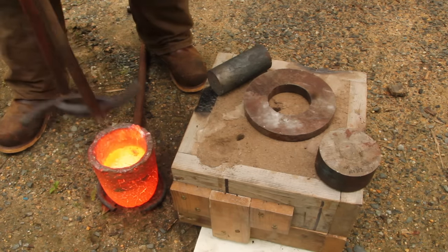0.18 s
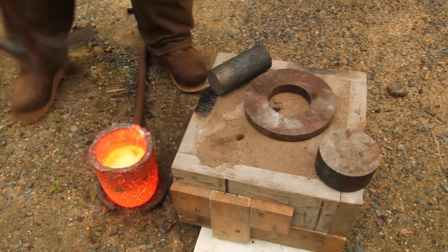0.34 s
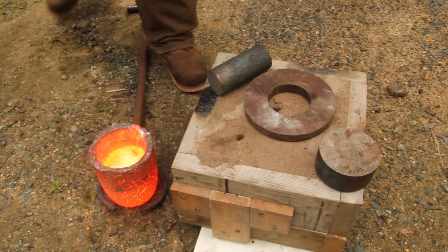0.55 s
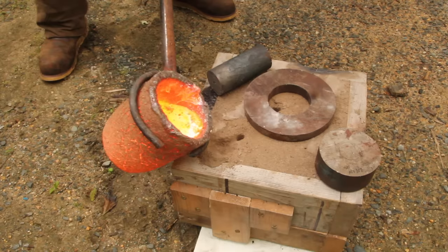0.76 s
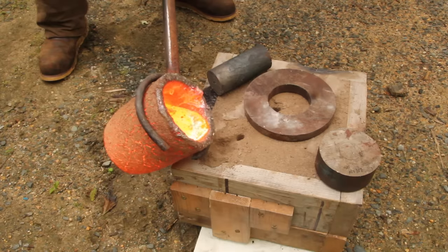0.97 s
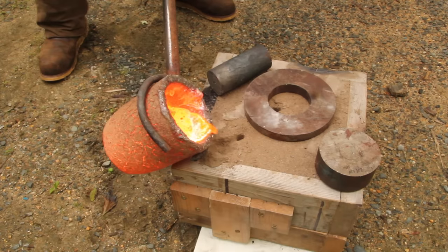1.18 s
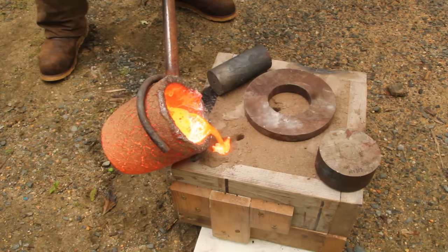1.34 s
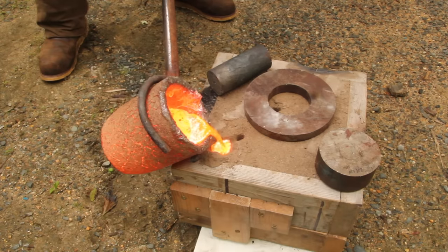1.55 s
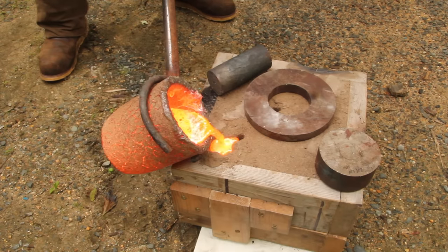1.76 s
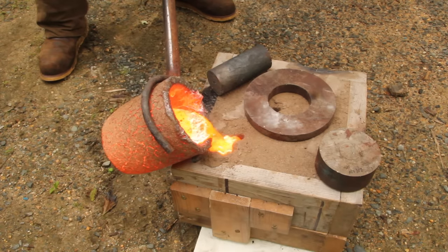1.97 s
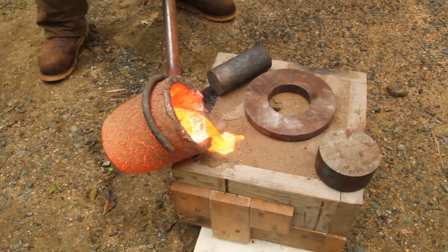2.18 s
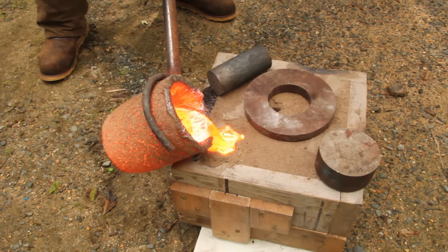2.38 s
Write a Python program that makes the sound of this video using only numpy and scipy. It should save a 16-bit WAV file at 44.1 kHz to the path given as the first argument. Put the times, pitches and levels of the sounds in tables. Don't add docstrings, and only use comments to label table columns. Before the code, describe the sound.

Iron tongs land on gravel with one sharp, bright double clink and gritty crack, quickly damped; a soft boot scrape follows, then sparse spits and growing faint sizzle of poured metal, close microphone in an open yard.

```python
import sys
import numpy as np
from scipy import signal
from scipy.io import wavfile

SR = 44100
rng = np.random.default_rng(int(sys.argv[2]) if len(sys.argv) > 2 else 0)


def transcribe(signal):
    frames = np.atleast_2d(signal).T
    limited = np.clip(frames, -1, 1)
    pcm = np.round(limited * 32767).astype(np.int16)
    wavfile.write(sys.argv[1], SR, pcm)


def amplitude_ratio(level_db):
    exponent = np.asarray(level_db, float) / 20
    return 10 ** exponent


N = 105840


def in_time(rows):
    return np.interp(np.arange(N) / SR, *np.transpose(rows))


def rms_one(x):
    return x / np.sqrt(np.mean(x ** 2) + 1e-20)


def band(x, hz, order=2):
    sos = signal.butter(order, np.clip(hz, 10, .45 * SR), "band", fs=SR, output="sos")
    return signal.sosfilt(sos, x + 1e-18)


def clicks(s, gains):
    out = np.zeros(N)
    out[(np.asarray(s) * SR).astype(int)] = gains
    return out


def drift(rate_hz):
    r = np.exp(-80 * np.pi * rate_hz / SR)
    noise = rng.standard_normal(N // 40 + 2002)
    slow = signal.lfilter([1], [1, -2 * r, r * r], noise)[2000:]
    return np.interp(np.arange(N) / 40, np.arange(len(slow)), rms_one(slow))


def coloured(spectrum, patchy_db):
    out = 0
    edges_hz = 45 * 2 ** np.arange(0, 8.6, .5)
    white = rng.standard_normal((2, N))
    hz, db = np.transpose(spectrum)
    for k, pair in enumerate(zip(edges_hz, edges_hz[1:])):
        level_db = np.interp(np.log(pair).mean(), np.log(hz), db)
        out = out + amplitude_ratio(level_db + patchy_db * drift(6.7)) * band(white[k % 2], pair)
    return rms_one(out)


def strike(pitches_hz, modes, s, db):
    out = np.zeros(N)
    for hz, (level_db, t60_s) in zip(pitches_hz, modes):
        r = amplitude_ratio(-60 / (t60_s * SR))
        w = 2 * np.pi * hz / SR
        push = clicks(s, amplitude_ratio(db + level_db + .8 * rng.standard_normal(len(s))))
        out += signal.lfilter([0, np.sin(w)], [1, -2 * r * np.cos(w), r * r], push + 1e-18)
    return out


# time in s, level of the arm in dB, level of the jaw in dB.
TOUCHES = [
    (.2465, -36, -44),
    (.2474, -34, -44),
    (0.2484, -10, -28),
    (0.2512, -14.5, -44),
    (0.2537, -21.5, -44),
    (0.2557, -23, -14.5),
    (.2578, -28.5, -24),
    (0.2606, -30.5, -24),
    (0.282, -33.5, -33.5),
    (.2885, -47, -48),
]
ARM_HZ = [1580, 2000, 2462, 4120, 4900, 5300, 5440, 5855, 8230, 9690, 11640, 12700, 13910, 15600]
JAW_HZ = [1809, 2710, 3355, 4240, 4637, 6460, 6656, 6975, 7364, 8858, 9330, 10510, 11880, 14550]
# level in dB, t60 in s.
ARM_MODES = [(-9, .09), (-10, .09), (-19, 0.053), (-7, .11), (-14, .05), (-2.5, .055), (-5, .055),
             (-8.5, 0.077), (-17.5, .08), (-12.5, 0.062), (-31.5, .06), (-23.5, .05), (-28, .05),
             (-23.5, 0.055)]
JAW_MODES = [(-14, .06), (-15, .06), (-1.5, .09), (-9, .12), (-15.5, 0.042), (-12.5, .12), (-4.5, 0.078),
             (-11, .07), (-1.5, 0.094), (-1.5, .16), (-16, 0.11), (-23, .03), (-21, 0.065), (-20.5, .05)]
# frequency in Hz, density in dB per Hz.
CRACK = [(150, -32), (600, -22), (1200, -21), (1900, -9), (3350, -7), (5360, -1.5), (9500, -14),
         (16000, -28)]


def tongs():
    crack_db, crack_t60_s = -11.5, 0.061
    settle_s, settle_over_s, settle_loss_db = 0.2666, .012, -9.5
    thud_hz, thud_db, thud_t60_s = 260, -49, .08
    s, arm_db, jaw_db = np.transpose(TOUCHES)
    ring = strike(ARM_HZ, ARM_MODES, s, arm_db) + strike(JAW_HZ, JAW_MODES, s, jaw_db)
    settled = np.clip((np.arange(N) / SR - settle_s) / settle_over_s, 0, 1)
    thin = signal.butter(2, 1350, "high", fs=SR, output="sos")
    ring = signal.sosfilt(thin, ring * amplitude_ratio(settle_loss_db * settled))
    ring = ring + strike([thud_hz], [(thud_db, thud_t60_s)], s[2:3], 0)

    hits = clicks(s, amplitude_ratio(np.maximum(arm_db, jaw_db)))
    dying = signal.lfilter([1], [1, -amplitude_ratio(-60 / (crack_t60_s * SR))], hits + 1e-18)
    return ring, amplitude_ratio(crack_db) * dying * coloured(CRACK, patchy_db=.3)


# delay in s, level in dB.
ECHOES = [
    (.0355, -29),
    (.047, -40),
    (.105, -38),
]


def yard(x):
    tail_db, tail_t60_s, tail_rise_s = -32, 0.58, 0.024
    wall_cut_hz, echo_spread_s = 5300, 0.0026
    t = np.arange(N) / SR
    tail = amplitude_ratio(tail_db - 20.5 - 60 * t / tail_t60_s) * (1 - np.exp(-t / tail_rise_s))
    reply = tail * rng.standard_normal(N)
    for lag_s, db in ECHOES:
        smear = (t >= lag_s) * np.exp(-np.abs(t - lag_s) / echo_spread_s)
        reply += amplitude_ratio(db - 13) * smear * rng.standard_normal(N)
    reply = signal.sosfilt(signal.butter(1, wall_cut_hz, fs=SR, output="sos"), reply)
    return signal.fftconvolve(x, reply)[:N]


# frequency in Hz, density in dB per Hz.
SCRAPE = [(120, -21), (300, 3), (800, -6.5), (2000, -12.5), (6000, -28.5)]


def scrape():
    peak_s, rise_s, fall_s, level_db = 0.35, .07, 0.18, -56
    t = np.arange(N) / SR - peak_s
    stroke = np.exp(-(t / np.where(t < 0, rise_s, fall_s)) ** 2)
    return amplitude_ratio(level_db) * stroke * coloured(SCRAPE, patchy_db=3.5)


# time in s, peak in dB, treble share in dB.
SPITS = [(.2011, -40, -20), (.4443, -47, 0), (1.1644, -34, -5.5), (1.3705, -42, -22), (1.4586, -32, -32),
         (1.5063, -37, -11), (1.5719, -44, -2), (1.5863, -44, -1), (1.6254, -41, -4), (1.9455, -47, 0),
         (1.9718, -42, -1), (2.035, -51, -4), (2.0775, -38, -22), (2.081, -42, 3), (2.0957, -41, -4),
         (2.1234, -52, -7), (2.1257, -42.5, 1.5), (2.1626, -32, -2), (2.1787, -40, -9), (2.1889, -33, -3),
         (2.2088, -39, -10), (2.2238, -41.5, -6.5), (2.2273, -38.5, -6), (2.2368, -46, -25),
         (2.2862, -32, -4), (2.3259, -27, -5), (2.3657, -40.5, -24), (2.3732, -44, -9), (2.3923, -40, -3.5)]


def spits():
    spit_hz, split_hz = (2500, 15500), 8500
    tail_db, tail_s = -19, .001
    s, db, treble_db = np.transpose(SPITS)
    rough = rng.standard_normal(N)
    low_pass = signal.butter(3, split_hz, fs=SR)

    def bursts(gains):
        burst = clicks(s, gains)
        tail = signal.lfilter([amplitude_ratio(tail_db)], [1, -np.exp(-1 / (tail_s * SR))], burst + 1e-18)
        wide = band(tail * rough - burst, spit_hz)
        return wide, signal.filtfilt(*low_pass, wide)

    _, body = bursts(amplitude_ratio(db + 8))
    wide, below = bursts(amplitude_ratio(db + treble_db + 9.5))
    return body + wide - below


# time in s, level in dB.
SIZZLE = [(1.3, -77), (1.5, -70), (1.62, -70), (1.7, -73), (1.8, -70), (1.95, -68), (2.05, -71), (2.1, -65),
          (2.23, -64), (2.26, -71), (2.33, -65), (2.4, -67)]


def sizzle():
    grains_per_s, grain_spread_db, steam_share = 1800, 3.8, .6
    sizzle_hz, gain_db = (6100, 15400), 0.5
    start_s, fade_s = 1.25, .2
    sizes = amplitude_ratio(grain_spread_db * np.minimum(rng.exponential(1, N), 4)) * rng.choice([-1, 1], N)
    born = rng.random(N) < grains_per_s * amplitude_ratio(4 * drift(25)) / SR
    smooth = steam_share * amplitude_ratio(3 * drift(15)) * rng.standard_normal(N)
    steam = rms_one(sizes * born) + smooth
    begun = np.clip((np.arange(N) / SR - start_s) / fade_s, 0, 1)
    return begun * amplitude_ratio(in_time(SIZZLE) + gain_db) * rms_one(band(steam, sizzle_hz))


# time in s, length in s, start pitch in Hz, end pitch in Hz, level in dB.
CHIRPS = [
    (.78, 0.16, 6800, 7300, -71),
    (.62, .08, 7250, 7100, -76),
    (.68, 0.104, 6600, 6300, -76),
    (.95, 0.19, 6400, 6900, -75),
    (1.935, .03, 2600, 2800, -72),
    (2.291, .01, 4190, 5500, -70),
    (2.366, 0.017, 3100, 4900, -68),
]


def chirps():
    out = np.zeros(N)
    t = np.arange(N) / SR
    for s, length_s, start_hz, end_hz, db in CHIRPS:
        u = np.clip((t - s) / length_s, 0, 1)
        phase = 2 * np.pi * np.cumsum(start_hz + (end_hz - start_hz) * u) / SR
        out += amplitude_ratio(db + 7) * drift(70) * np.sin(np.pi * u) ** .6 * np.sin(phase)
    return out


# frequency in Hz, density in dB per Hz.
AIR = [(60, -7), (110, -5.5), (250, -14.5), (700, -19), (2500, -20.5), (6800, -22), (10000, -32),
       (16000, -38.5)]
# time in s, level in dB.
AIR_LEVEL = [(0.0, -60.5), (0.25, -59.5), (0.39, -58.5), (0.73, -59.5), (1.63, -60), (2.4, -60.5)]


def far_hiss():
    gain_db = 2.5
    return amplitude_ratio(in_time(AIR_LEVEL) + gain_db) * coloured(AIR, patchy_db=1.1)


# time in s, level in dB.
GUST = [(0.0, -75), (0.03, -59), (0.21, -65.5), (0.3, -51.5), (0.33, -68), (0.95, -69), (1.04, -51.5),
        (1.09, -63), (1.32, -58), (1.5, -68.5), (1.66, -48.5), (1.75, -68), (1.86, -61.5), (1.91, -74),
        (2.28, -59), (2.4, -75)]


def wind():
    return amplitude_ratio(in_time(GUST)) * rms_one(band(rng.standard_normal(N), (14.6, 39.7)))


def port_rumble():
    return amplitude_ratio(-88.5) * rms_one(band(rng.standard_normal(N), (12, 60)))


def scene():
    ring_echo_db, grit_echo_db = .3, 2.5
    ring, grit = tongs()
    echoes = yard(amplitude_ratio(ring_echo_db) * ring + amplitude_ratio(grit_echo_db) * grit)
    pour = spits() + sizzle() + chirps()
    mid = ring + grit + echoes + scrape() + pour + far_hiss() + wind()
    side = port_rumble()
    return np.array([mid + side, mid - side])


def band_limit(x):
    return signal.sosfilt(signal.butter(12, 16840, fs=SR, output="sos"), x)


def record(dry):
    rounded = .9 * np.tanh(dry / .9)
    top_cut = signal.cheby2(12, 32, 16050, fs=SR, output="sos")
    offset = np.array([-.00128, -.00188])
    mix = signal.sosfilt(top_cut, rounded) + offset[:, None]
    return band_limit(mix)


dry = scene()
out = record(dry)
transcribe(out)
```